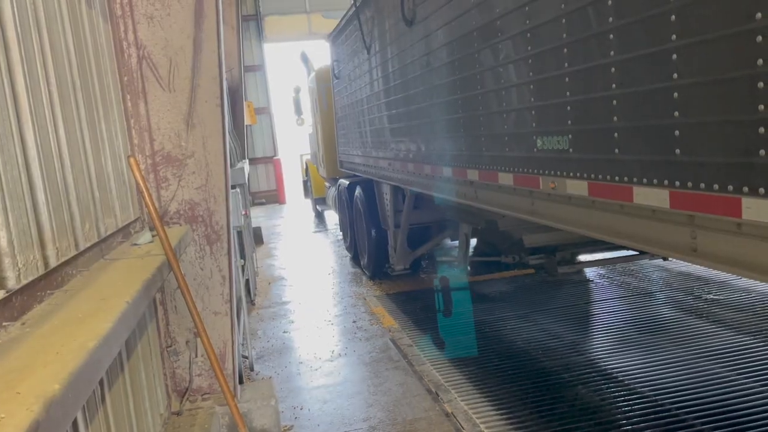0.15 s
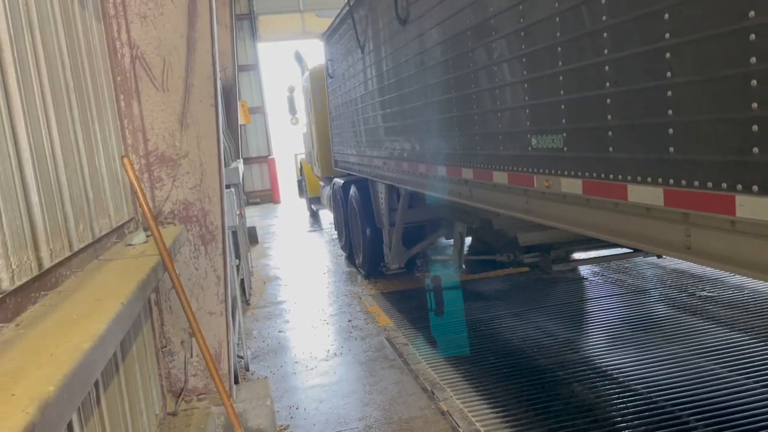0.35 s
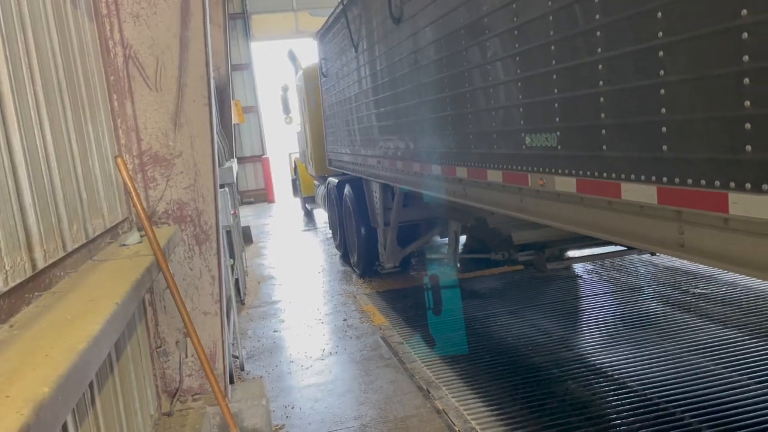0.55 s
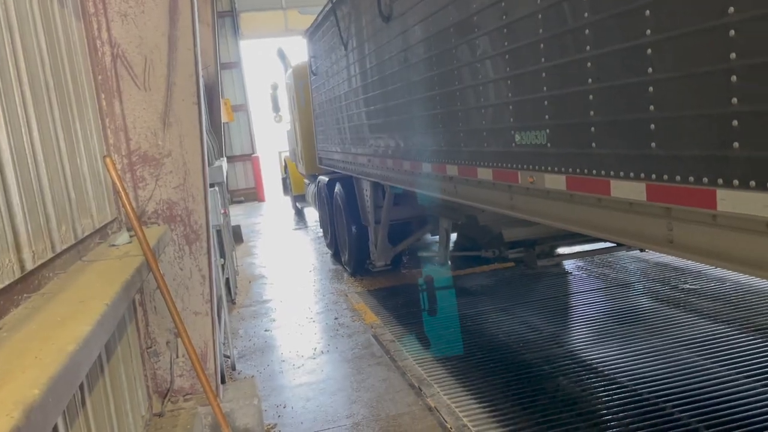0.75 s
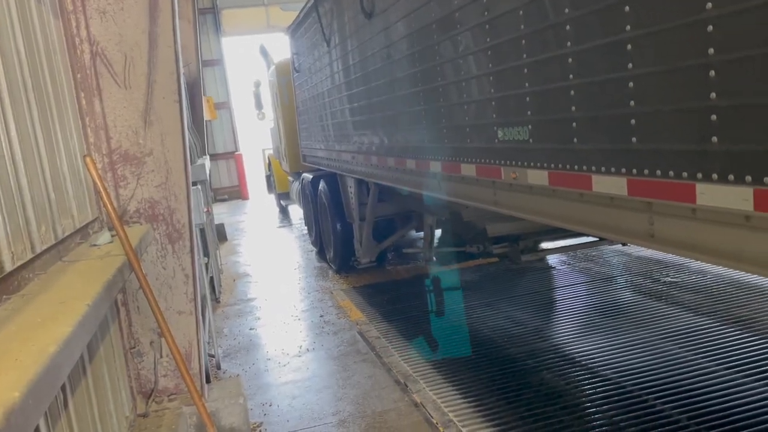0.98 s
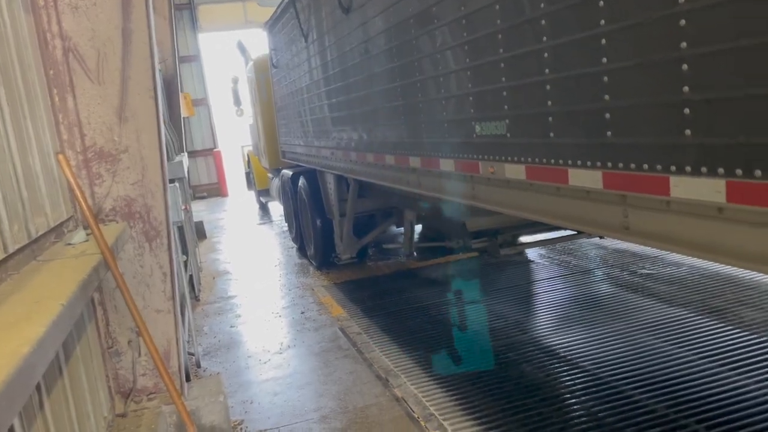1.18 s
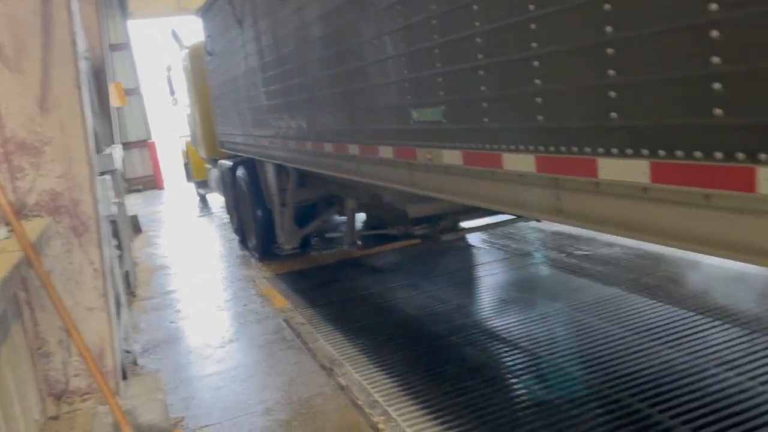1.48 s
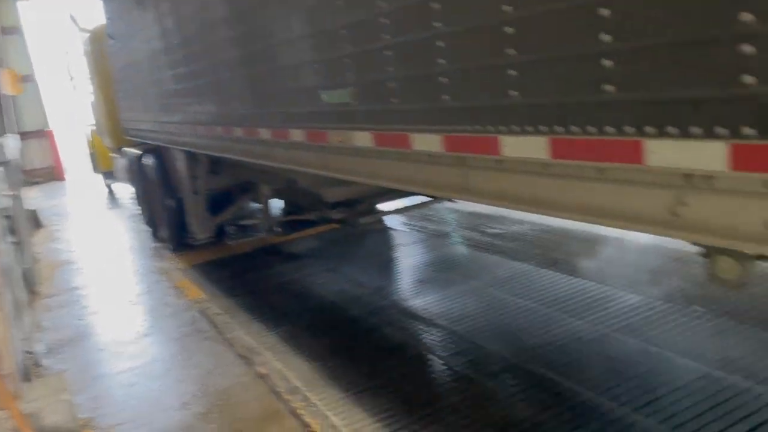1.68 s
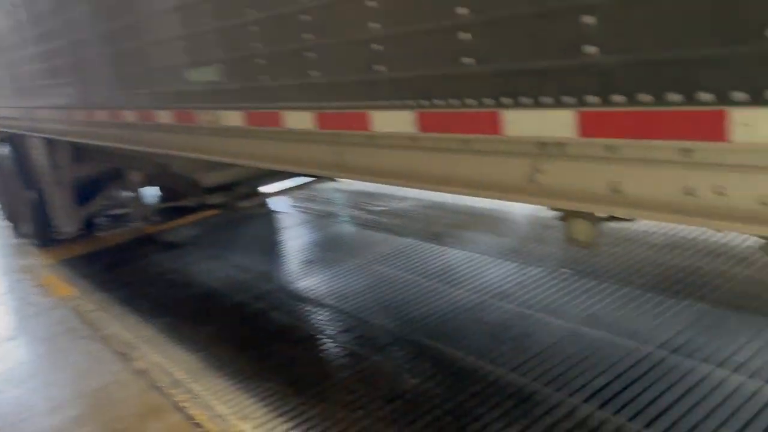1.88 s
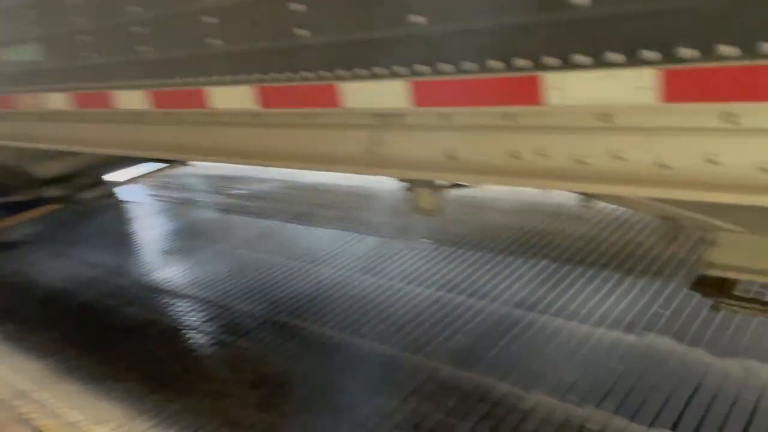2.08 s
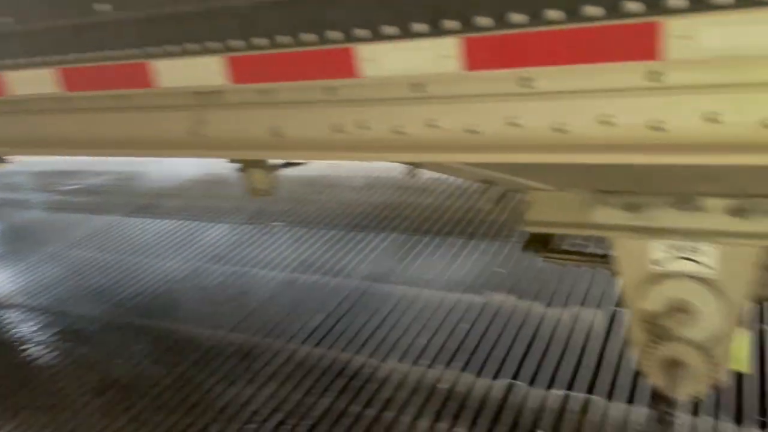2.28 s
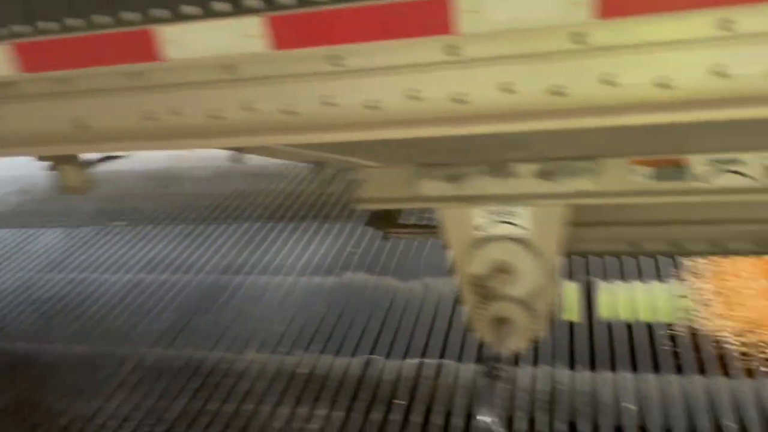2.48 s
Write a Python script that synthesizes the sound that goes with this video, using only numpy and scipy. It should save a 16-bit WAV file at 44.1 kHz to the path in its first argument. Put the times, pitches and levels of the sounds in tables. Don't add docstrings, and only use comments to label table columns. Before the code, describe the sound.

Steady hissing rush of falling grain on metal bars, with deep pit rumble and constant hum

```python
import sys
import numpy as np
from scipy import signal
from scipy.io import wavfile
from scipy.ndimage import uniform_filter1d

SR = 44100
rng = np.random.default_rng(int(sys.argv[2]) if len(sys.argv) > 2 else 0)


def wav_out(sig):
    wavfile.write(sys.argv[1], SR, np.round(np.clip(np.atleast_2d(sig).T, -1, 1) * 32767).astype(np.int16))


def linear_from_db(decibels):
    return 10 ** (np.asarray(decibels, float) / 20)


N = 116865


def evened(x):
    return x / np.sqrt(np.mean(abs(x) ** 2) + 1e-20)


def read(points, hz):
    f, value = np.transpose(points)
    return np.interp(np.log(hz + 1), np.log(f + 1), value)[:, None]


def along(points, t):
    return np.interp(t, *np.transpose(points))


# time_s [s], turn [0-1]
TURN = [
    (0, 0.),
    (1.4, 0),
    (1.9, .6),
    (2.3, 1),
    (2.65, 1),
]
# time_s [s], sway [above 0 = less alike]
SWAY = [(0, -.2), (.29, -.2), (.34, 1.6), (.39, 0.18), (.71, 0.3), (.78, -0.03), (1.0, .1), (1.12, -1.8),
        (1.24, -0.045), (1.295, 2.3), (1.35, -0.24), (1.57, .8), (1.75, -1.1), (1.9, 1), (1.97, 0.027),
        (2.13, -1.9), (2.3, -0.29), (2.65, .4)]
# frequency_hz [Hz], drop_db [dB]
SHADOW = [(45, 0.5), (200, 1.8), (900, 1.5), (2000, 2.6), (3500, 4), (5000, 5.5), (6500, 1.2), (8000, 0)]


def ports(pair, colour, same, lead, patchy_db, size=1024, swayed=0, lift_db=lambda hz, turn: 0):
    overlap = size - size // 4
    hz, t, z = signal.stft(pair, SR, nperseg=size, noverlap=overlap)
    turn = np.clip(along(TURN, t), 0, 1)

    patch_s, patch_hz = 0.09, min(600, hz[1] * 30)
    patches = rng.standard_normal((len(t), len(hz))).T
    patches = uniform_filter1d(patches, size=round(patch_hz / hz[1]), axis=0)
    patches = evened(uniform_filter1d(patches, size=round(patch_s / t[1]) + 1, axis=1))

    alike = read(same, hz)
    loosening = np.exp(swayed * alike ** 4 * along(SWAY, t))
    coherence = np.clip(1 - (1 - alike) * loosening, 0, 1)
    right = coherence * z[0] * np.exp(1j * read(lead, hz)) + np.sqrt(1 - coherence ** 2) * z[1]

    shadow_lift = 0.45
    shadow_db = read(SHADOW, hz) * (1 - shadow_lift * turn)
    band = (hz[:, None] >= colour[0][0]) & (hz[:, None] <= colour[-1][0])
    z = np.array([z[0], right * linear_from_db(-shadow_db)]) * band
    z = z * linear_from_db(read(colour, hz) + patchy_db * patches + lift_db(hz[:, None], turn))
    return evened(signal.istft(z, SR, nperseg=size, noverlap=overlap)[1][:, :N])


# time_s [s], level_db [dB]
SURGE = [(0, -31), (.2, -26), (.36, -30), (.51, -21), (.64, -27.5), (.75, -24), (.86, -29), (1.1, -28),
         (1.5, -27.5), (1.75, -31), (2.05, -26.5), (2.3, -29.5), (2.65, -31.)]
# time_s [s], level_db [dB]
DRONE = [
    (0.0, -32),
    (0.12, -34.5),
    (0.22, -29),
    (0.26, -32.5),
    (2.0, -33),
    (2.34, -31.5),
    (2.43, -36.5),
    (2.6, -33),
    (2.65, -37),
]
# frequency_hz [Hz], level_db [dB]
RUMBLE = [(24, -23), (57, 1.5), (92, -0.5), (112, -7), (150, -8), (200, -8), (420, -13.5), (640, -24)]
# frequency_hz [Hz], coherence [0-1]
RUMBLE_SAME = [(50, .9995), (80, .985), (160, .9), (300, .83), (600, .5)]


def rumble():
    t = np.arange(N) / SR
    no_lead = [(20, 0), (2000, 0)]
    noise = rng.standard_normal((N, 2)).T
    pit = ports(noise, RUMBLE, RUMBLE_SAME, no_lead, patchy_db=0.8, size=8192)
    boom = signal.sosfiltfilt(signal.butter(4, 108, fs=SR, output="sos"), pit)
    drone = pit - boom
    return linear_from_db(2.5) * (boom * linear_from_db(along(SURGE, t)) + drone * linear_from_db(4.0 + along(DRONE, t)))


def hum():
    t = np.arange(N) / SR
    pitch_hz, level_db, waver_db = 119.5, -30.5, 1.4
    right_db, right_lead = -0.9, 0.34
    fourth_db, fourth_lead = -52, 1.34

    waver = np.zeros(N)
    for f in np.geomspace(0.3, 5, num=16):
        waver += np.sin(2 * np.pi * (f * t + rng.random())) / np.sqrt(f)
    waver = evened(waver)

    phase = 2 * np.pi * pitch_hz * t
    tone = np.array([np.sin(phase), linear_from_db(right_db) * np.sin(phase + right_lead)])
    fourth = np.array([np.sin(4 * phase), np.sin(4 * phase + fourth_lead)])
    tone = tone + linear_from_db(fourth_db - level_db) * fourth
    return np.sqrt(2) * linear_from_db(level_db + waver_db * waver) * tone


def taps(per_s, spread_db):
    struck = rng.random((N, 2)).T < per_s / SR
    size = rng.exponential(1, (N, 2)).T
    sign = rng.choice([-1., 1.], (N, 2)).T
    return sign * linear_from_db(spread_db * np.minimum(size, 4)) * struck


# frequency_hz [Hz], level_db [dB]
CLATTER = [(450, -8.5), (650, -3), (960, 1.5), (1350, -1), (2150, -6), (2950, -2), (5250, -1.76),
           (5750, -10.5)]
# frequency_hz [Hz], coherence [0-1]
CLATTER_SAME = [(700, 0.16), (1500, 0.41), (2400, 0.44), (3000, 0.5), (4800, 0.65), (5400, 0.61)]
# frequency_hz [Hz], lead_rad [radians]
CLATTER_LEAD = [(500, 0.82), (1000, 0.79), (1600, 1.83), (2250, 0.38), (3500, -1.2), (4200, -0.69),
                (5300, -1.34)]


def clatter():
    def tilt_db(hz, turn):
        pivot_hz, tilt = 2140, 0.47
        return tilt * turn * np.tanh(2 * np.log((hz + 1) / pivot_hz))

    strikes = taps(per_s=16000, spread_db=2.5)
    return linear_from_db(-28) * ports(strikes, CLATTER, CLATTER_SAME, CLATTER_LEAD, patchy_db=0.79, lift_db=tilt_db)


# frequency_hz [Hz], level_db [dB]
FIZZ = [(5300, -10), (5850, -2), (7300, -2), (9000, -0.7), (11600, -2.5), (14200, 0.3), (15500, -2.5),
        (16500, -1)]
# frequency_hz [Hz], coherence [0-1]
FIZZ_SAME = [(5800, 0.56), (6600, .5), (7100, 0.53), (7600, 0.68), (8150, .8), (9000, 1), (10800, 0.73),
             (12500, 1)]
# frequency_hz [Hz], lead_rad [radians]
FIZZ_LEAD = [(5800, 1.86), (6800, .2), (7350, 3.2), (8000, 3.06), (9500, 3.43), (10500, 4.33),
             (11400, 6.05), (12300, 2 * np.pi)]


def fizz():
    def facing_db(hz, turn):
        centre_hz, width_hz, gain_db = 9060, 2060, 3.5
        return gain_db * turn * np.exp(-((hz - centre_hz) / width_hz) ** 2)

    ticks = taps(per_s=26000, spread_db=0.2)
    return linear_from_db(-23) * ports(ticks, FIZZ, FIZZ_SAME, FIZZ_LEAD, patchy_db=0.45, swayed=1, lift_db=facing_db)


def scene():
    return rumble() + hum() + clatter() + fizz()


def roll_off(x):
    return signal.sosfilt(signal.butter(12, 15780, fs=SR, output="sos"), x)


def record(dry):
    return roll_off(dry)


dry = scene()
out = record(dry)
wav_out(out)
```